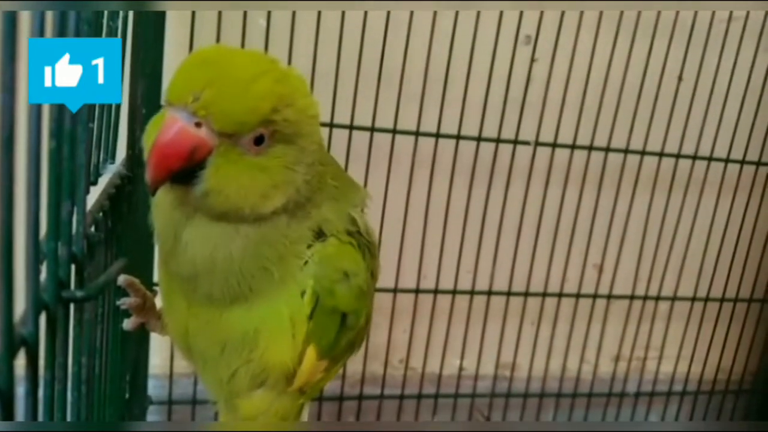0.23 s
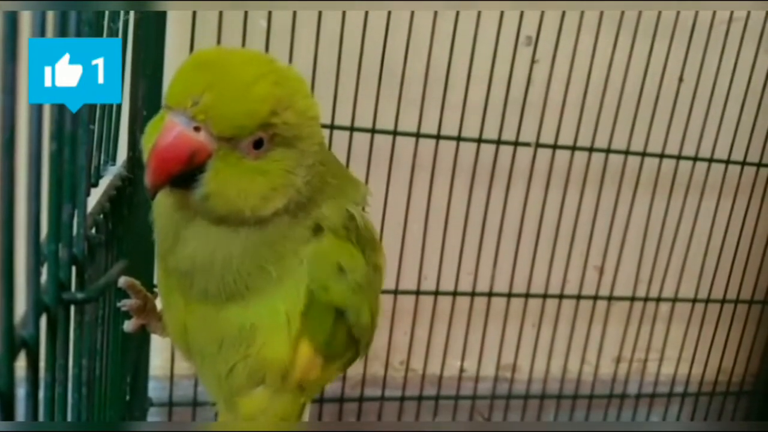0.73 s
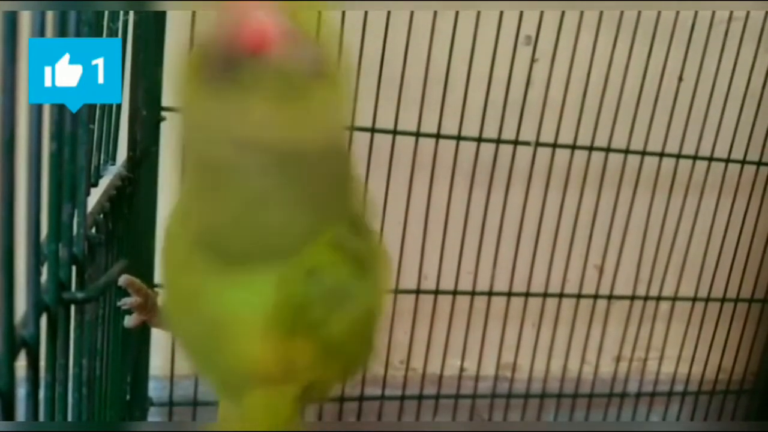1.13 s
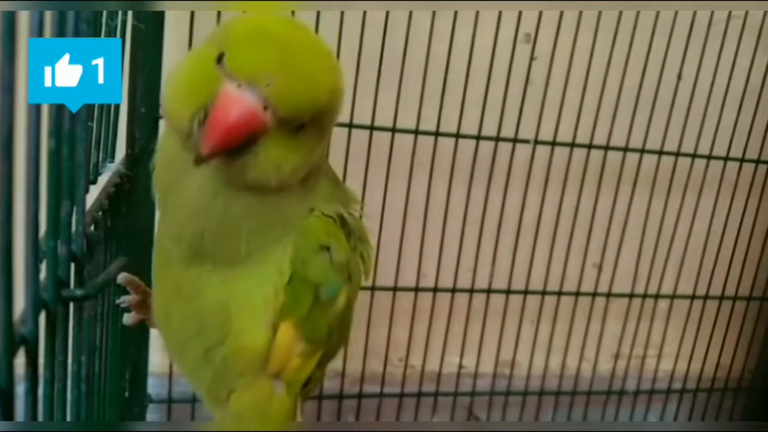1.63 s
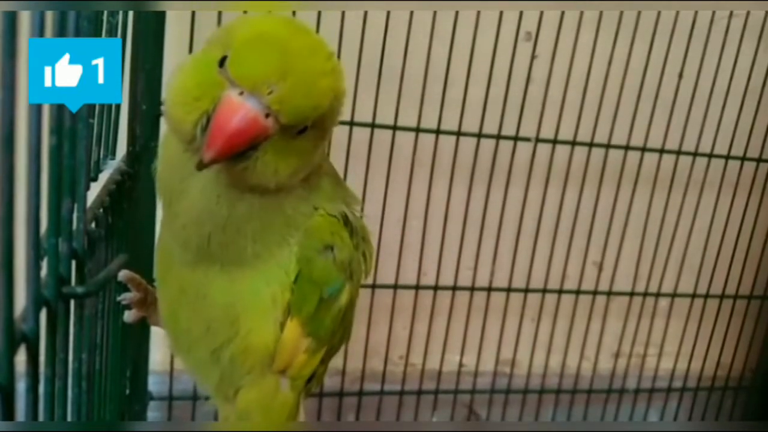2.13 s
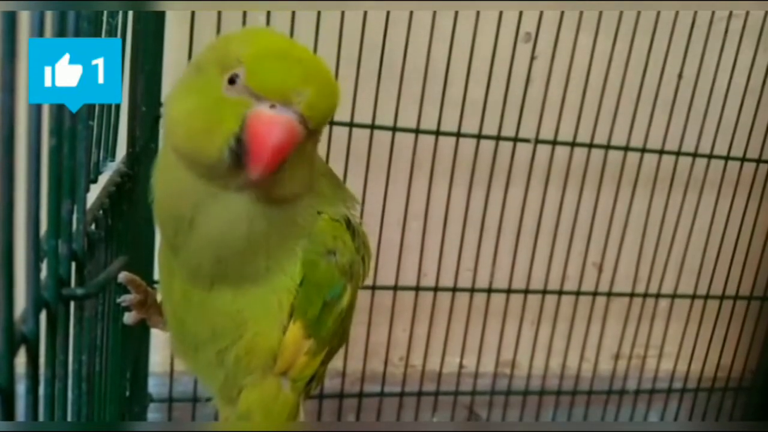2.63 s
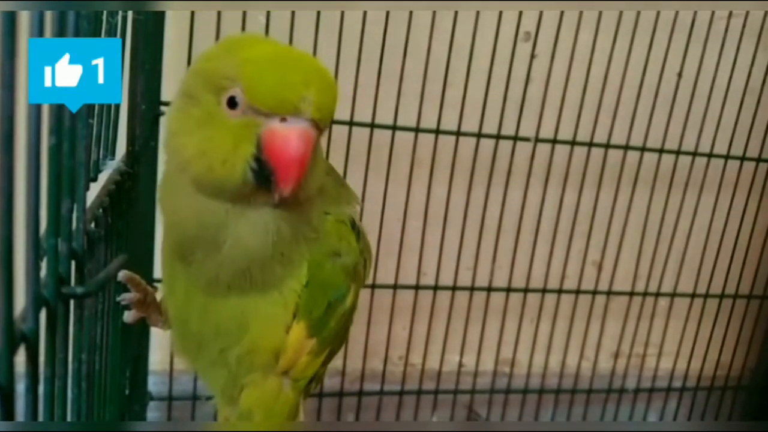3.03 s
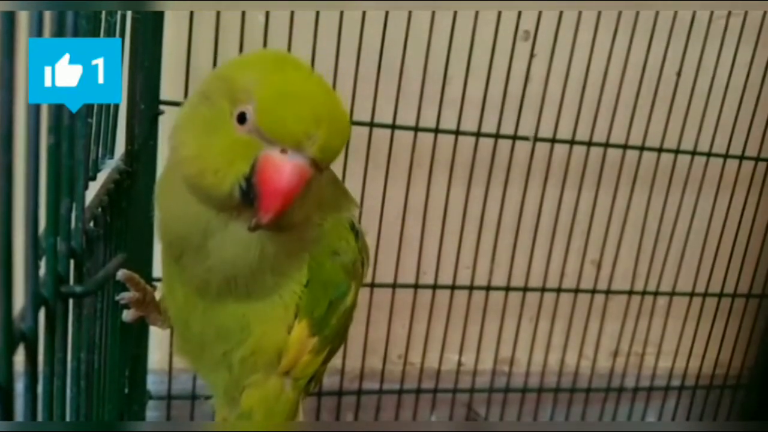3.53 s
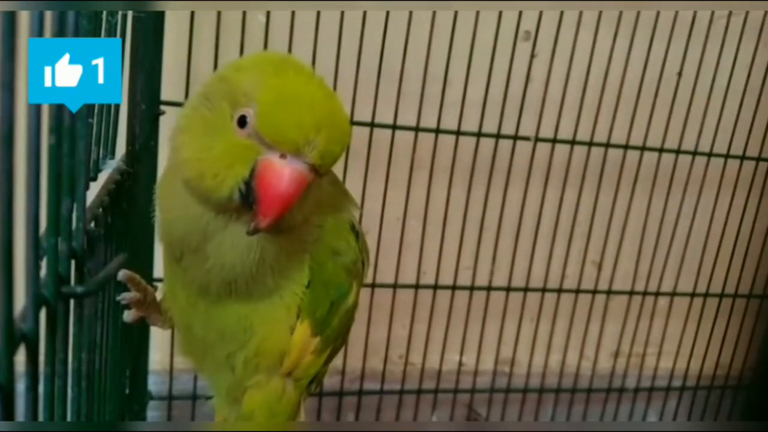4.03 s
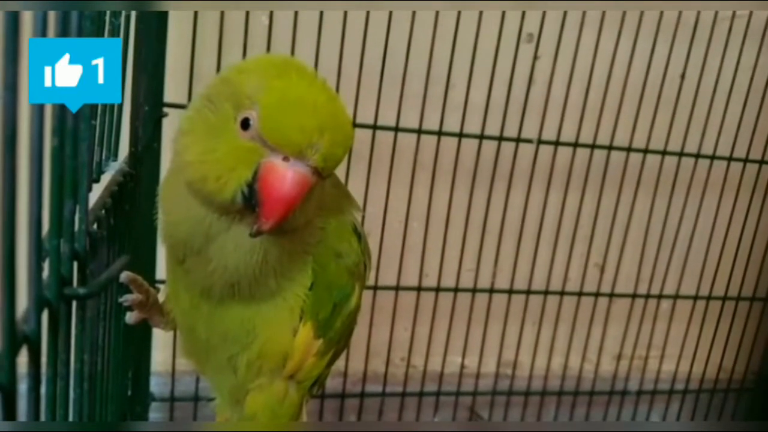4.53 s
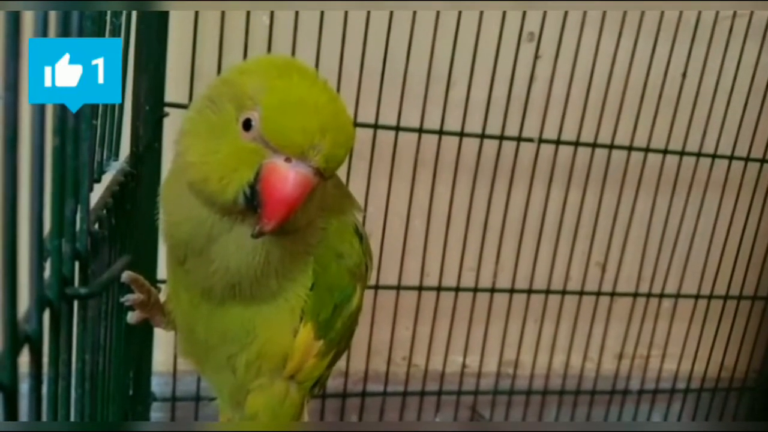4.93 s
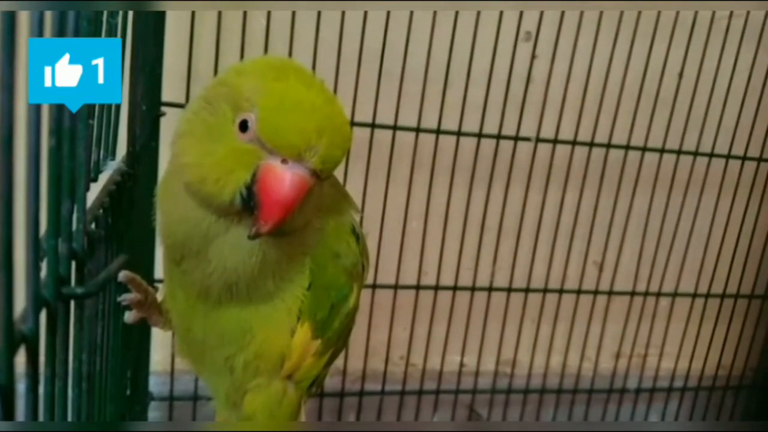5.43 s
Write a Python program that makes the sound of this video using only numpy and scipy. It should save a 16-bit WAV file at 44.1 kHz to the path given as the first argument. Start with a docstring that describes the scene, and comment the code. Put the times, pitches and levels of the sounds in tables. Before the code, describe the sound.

In a hard, reverberant room, a caged parakeet buzzes, squawks and pops with beak clicks, over a more distant bird's gliding whistles.

```python
"""In a hard, echoing room with a low hum, a ring-necked parakeet calls close by in a faintly ringing wire cage.
It gives a long nasal call, four short squawks, a falling cry and five hollow pops, with beak clicks between.
Its calls are a buzz filtered by a throat; pops are short sliding tones, clicks dying tones, rustles hiss.
Further off a small songbird, probably a canary, twitters in gliding whistles. Noise makes the room's echo
and its steady rush; a sine makes the hum."""
import sys
import numpy as np
from scipy import signal
from scipy.fft import rfft, irfft, next_fast_len
from scipy.io import wavfile
from scipy.ndimage import uniform_filter1d, map_coordinates

SR = 44100
rng = np.random.default_rng(int(sys.argv[2]) if len(sys.argv) > 2 else 0)


def int16_out(signal):
    """Quantize to a 16-bit WAV file."""
    q = np.round(np.clip(np.atleast_2d(signal).T, -1, 1) * 32767)
    wavfile.write(sys.argv[1], SR, q.astype(np.int16))


N = 250929
T = np.arange(N) / SR


def undb(db):
    """Turn decibels into a gain."""
    return 10 ** (np.asarray(db) / 20)


def unit(x):
    """Scale to an average (rms) strength of 1."""
    return x / np.sqrt(np.mean(x ** 2))


def add(track, start_s, x):
    """Mix x into the track from the given time."""
    i = int(start_s * SR)
    track[i:i + len(x)] += x[:N - i]


def controls(rows):
    """Join the rows of a curve by straight lines, giving one array a column."""
    time_s, *columns = np.transpose(rows)
    t = np.arange(time_s[0], time_s[-1], 1 / SR)
    return [np.interp(t, time_s, column) for column in columns]


def fade(n, edge_s):
    """A gate that opens and closes softly."""
    return signal.windows.tukey(n, min(1, 2 * edge_s * SR / n))


def wander(n, rate_hz):
    """Smooth chance of spread 1 that changes at the given rate."""
    position = np.arange(n) * rate_hz / SR
    return unit(map_coordinates(rng.standard_normal(8192), [position], order=3, mode="wrap"))


def colour(x, points):
    """Filter to the given (pitch_hz, gain_db) curve; the filter never sounds ahead of its input."""
    n = 2 * next_fast_len(x.shape[-1])
    hz, db = np.transpose(points)
    # the curve is joined evenly by musical interval; +1 avoids the logarithm of zero
    log_hz = np.log(np.fft.rfftfreq(n, 1 / SR) + 1)
    cepstrum = irfft(np.log(undb(np.interp(log_hz, np.log(hz), db))))
    # folding the cepstrum onto its first half gives the shortest delay (minimum phase)
    cepstrum[1:n // 2] *= 2
    cepstrum[n // 2 + 1:] = 0
    return irfft(rfft(x, n) * np.exp(rfft(cepstrum)))[..., :x.shape[-1]]


def ring(modes, t):
    """A struck body sounds several tones at once, each dying away at its own speed."""
    return sum(undb(db - 60 * t / t60_s) * np.sin(2 * np.pi * hz * t) for hz, db, t60_s in modes)


def room_tone(rush_db=-41.5):
    """Filtered noise gives a steady rush, with bass alike left and right; sines give a low hum."""
    # colour of the rush: (pitch_hz, relative_db)
    rush_colour = [(24, -67), (40, -12.5), (85, -11), (124, 1.5), (276, -15), (312, -7), (585, -17),
                   (831, -7.5), (16000, -45.5)]
    # hum tones: (pitch_hz, level_db)
    hum_tones = [(61, -56)]
    mid, side = colour(rng.standard_normal((2, N)), rush_colour)
    side = colour(side, [(60, -24.0), (800, -10), (4000, -4.0)])
    rush = unit(mid + side * np.array([[1], [-1]])) * undb(rush_db)
    hum = sum(undb(db) * np.sqrt(2) * np.sin(2 * np.pi * hz * T) for hz, db in hum_tones)
    return rush + hum


def click(treble_db):
    """The horny beak snaps; a harder contact wakes more of its high modes."""
    # tones of the beak: (pitch_hz, level_db before the treble tilt, t60_s to fall by 60 dB)
    beak_modes = [(800, -4.5, 0.0013), (1860, -10, 0.0017), (2380, 9.5, 0.0068), (3256, -5, 0.021),
                  (5220, 3.5, 0.0028), (7800, 4, 0.0046)]
    tilted = [(hz, db + treble_db * hz / (hz + 5000), t60_s) for hz, db, t60_s in beak_modes]
    snap = ring(tilted, T[:SR // 30])
    return colour(snap, [(80, -20), (400, 7.5)])  # so small a body radiates little bass


def cage_ring(x, cage_db=-60):
    """The wire cage rings in sympathy with every sound the parakeet makes."""
    # tones of the cage: (pitch_hz, level_db, t60_s to fall by 60 dB)
    cage_modes = [(2386, 0, 0.41), (2502, 6, 0.19)]
    return undb(cage_db) * signal.fftconvolve(x, ring(cage_modes, T[:SR // 4]))[:N]


def room(x, wet_db, early_db, t60_s=1.0, early_t60_s=0.12):
    """Hard walls send back sparse first reflections, then a diffuse tail that lacks the top."""
    t = T[:SR]
    noise = rng.standard_normal((2, 2, SR))
    tail = noise[0] * undb(-60 * t / t60_s) * np.clip(t / 0.03, 0, 1)
    tail = colour(tail, [(600, 4.5), (3000, 2.0), (6000, 4.0), (12000, -17)])
    # the fifth power leaves only a few strong peaks standing out
    early = noise[1] ** 5 * undb(-60 * t / early_t60_s) * (t > .002)
    response = sum(undb(db) * part / np.linalg.norm(part, axis=1, keepdims=True)
                   for db, part in ((wet_db, tail), (early_db, early)))
    return signal.fftconvolve(x[None], response, axes=1)[:, :N]


def squawk(hz, db, opening, rough, dull=.7):
    """The syrinx buzzes through the throat; when forced, its cycles go uneven and alternate strong and weak."""
    # throat with the beak nearly shut, and wide open: (pitch_hz, gain_db)
    shut_throat = [(300, -12.5), (650, -10), (1080, -7), (1430, -8), (2150, -0.5), (3100, -11), (4350, -18),
                   (5000, -27), (6700, -24), (7900, -28.5), (9300, -11.5), (10600, -22.5), (13500, -37)]
    open_throat = [(300, -15.5), (850, 0), (1400, -11.5), (1950, 6.5), (2850, 8.5), (3600, -3),
                   (4700, -17.5), (5700, 4.5), (6800, -9.5), (7900, -3.5), (9400, -42), (11200, -23),
                   (13000, -22)]
    # shares of unevenness at roughness 1: in pitch, in level, and on every second cycle
    jitter, shimmer, doubling = .048, .22, .4
    hiss, rasp = .22, .55  # gains of the two noises ahead of roughness
    skew, flicker_db = .45, 4  # pulse spread in radians, and spread of the high overtones' levels
    n = len(hz)
    unevenness = jitter * rough * wander(n, 800) + 0.0037 * wander(n, 220.3)
    hz = uniform_filter1d(hz, SR // 100) * (1 + unevenness)
    phase = 2 * np.pi * np.cumsum(hz) / SR
    soft_db = dull * np.minimum(db + 14.5, 0)  # soft notes lose their overtones
    # the membranes close gradually, which spreads each pulse over its cycle
    pulses = np.zeros(n)
    for k in range(1, 36):
        overtone_db = soft_db * np.maximum(k * hz - 1100, 0) / 1400
        if k > 6:  # the high overtones come and go, each on its own
            overtone_db = overtone_db + flicker_db * wander(n, 18)
        audible = k * hz < SR / 2
        pulses += undb(overtone_db) * np.cos(k * phase + skew * k * k) * audible
    pulses = unit(pulses) * (1 + rough * (shimmer * wander(n, 600) + doubling * np.cos(phase / 2)))
    # turbulence escapes once a cycle, mostly in the treble
    air = rng.standard_normal(N)[:n] * (1 + np.cos(phase))
    air = colour(air, [(1500, -6.0), (4000, 6.0), (9000, 14.0)])
    # at full force the buzz breaks up into a rasp, a burst on every second cycle
    bursts = rng.standard_normal(N)[:n] * (1 + np.cos(phase / 2))
    bursts = colour(bursts, [(700, -10), (2500, 5), (4000, -9)])
    source = pulses + hiss * rough * undb(soft_db) * air + rasp * rough ** 2 * bursts
    opening = np.clip(opening, 0, 1)
    voice = (1 - opening) * colour(source, shut_throat) + opening * colour(source, open_throat)
    # even out the loudness, then give it the wanted level
    steady = voice / np.sqrt(uniform_filter1d(voice ** 2, SR // 160))
    return steady * undb(db) * fade(n, edge_s=0.0062)


def long_call(curve):
    """A drawn-out nasal note buzzes through a nearly shut beak."""
    hz, db = controls(curve)
    return squawk(hz, db, opening=0, rough=.11)


def note(length_s, from_hz, to_hz, bend, flutter_hz, depth_hz):
    """A nearly pure whistle glides between two pitches; its flutter, if any, is a little uneven."""
    waver, slip = 0.018, 0.94  # share of pitch, and radians of flutter timing
    n = int(length_s * SR)
    u = np.linspace(0, 1, n)
    glide = (from_hz + (to_hz - from_hz) * u ** bend) * (1 + waver * wander(n, 299.7))
    flutter = depth_hz * np.sin(2 * np.pi * flutter_hz * T[:n] + slip * wander(n, 69.8))
    # skew under 1 peaks early; a higher taper is more pointed
    skew, taper = 0.41, 0.61
    if depth_hz:  # fluttering notes creep in and peak late
        skew, taper = 1.3, .9
    swell = np.abs(np.sin(np.pi * u ** skew)) ** taper * fade(n, edge_s=0.002)
    return swell * np.sin(2 * np.pi * np.cumsum(glide + flutter) / SR)


def songbird():
    """Trills and single syllables are sung note by note, each note a short whistle."""
    # syllables by name, one to three notes each: (delay_s, length_s, from_hz, to_hz,
    # bend: under 1 glides early and over 1 late, level_db); a pitch factor and a level are applied later
    syllables = { "warble": [(0.00028, 0.098, 4898, 5020, 0.85, 1.5)],
                 "dip": [(0, 0.019, 7200, 6480, 0.63, -5), (.022, 0.0205, 6450, 7200, 0.81, 1.5)],
                 "chip": [(0, .006, 5630, 3740, 0.83, 0.5), (.011, .022, 5360, 3565, 0.452, 0)],
                 "buzz": [(0, .1, 5150, 3937, .35, 1), (.012, .055, 6890, 4330, 1.5, -6.5)],
                 "fall": [(0.0032, .026, 3684, 2550, 0.794, 7.5)],
                 "rise": [(0.0018, 0.019, 3035, 3760, 0.6, 0.5)],
                 "twitter": [(0, 0.02395, 5430, 6140, 0.95, -4), (.021, 0.0178, 4750, 5640, 0.73, 3.5)],
                 "sweep": [(0, .008, 3830, 5000, 0.76, -16), (.006, .039, 5040, 2400, 0.66, -3)],
                 "flourish": [(.006, 0.0212, 2366, 3294, 0.455, -1.5),
                 (.024, 0.0128, 2930, 4680, 0.58, 0.5), (.032, .022, 4550, 4920, 0.59, -0.5)],
                 "flick": [(0, .0125, 5050, 3200, 2.3, -4.5)], "seep": [(0, 0.036, 6610, 4770, 0.59, 0.5),
                 (.04, 0.0374, 5500, 4780, 0.572, 4)], "tsip": [(0, 0.0085, 5640, 4190, 1, -9),
                 (.011, 0.0146, 4865, 3050, 0.783, -2.5), (.041, .009, 4100, 3300, 1, -8.5)],
                 "slur": [(0, .016, 4930, 5700, 0.8, -7), (.016, .024, 4147, 4740, 0.6, 4.5),
                 (.039, .058, 3900, 2500, 1.1, 2.5)], "chirrup": [(0, .016, 4930, 3430, 1.52, 11.5),
                 (.022, .055, 3240, 2160, 1.74, 9)], "whistle": [(0, 0.0319, 5510, 3710, 0.414, -11.5),
                 (.029, .05, 3466, 2500, 3, 0.5)]}
    # syllables whose pitch flutters: (rate_hz, depth_hz)
    flutters = {"warble": (84, 620), "buzz": (170, 460), "twitter": (66, 700)}
    # evenly repeated: (first_s, last_s, period_s roughly, syllable, level_db, pitch_factor)
    trills = [(1.375, 1.726, .07, "chip", -16.5, 0.96), (2.011, 2.259, .24, "buzz", -16, 0.95),
              (2.107, 2.336, .23, "fall", -24, 0.92), (2.478, 3.014, .135, "sweep", -10, 0.92),
              (2.572, 2.968, .133, "twitter", -26.5, 0.92), (3.472, 3.498, .012, "flick", -13, 0.97),
              (3.548, 3.63, .021, "flick", -20.5, 0.51), (3.846, 3.995, .145, "seep", -41.5, 0.91),
              (4.305, 4.359, .054, "tsip", -23, 0.85), (4.424, 4.696, .069, "tsip", -21.5, 0.92),
              (5.137, 5.298, .16, "chirrup", -37, 0.93)]
    # sung once: (start_s, syllable, level_db, pitch_factor)
    singles = [(0.964, "warble", -24.5, 0.99), (1.134, "dip", -24, 0.97), (1.19, "warble", -24.5, 0.98),
               (1.735, "warble", -18.5, 0.89), (2.179, "flick", -18.5, 1.36), (2.431, "rise", -14.5, 1.04),
               (3.096, "slur", -25.5, 0.68), (3.275, "whistle", -14, 1), (3.426, "flourish", -16.5, 1.01),
               (3.517, "fall", -22, 0.97), (4.130, "seep", -35, 0.89), (4.261, "tsip", -30, 0.83),
               (4.795, "slur", -26.5, 0.94), (4.977, "whistle", -22, 0.97)]
    out = np.zeros(N)
    sung = []
    for first_s, last_s, period_s, name, db, factor in trills:
        count = round((last_s - first_s) / period_s) + 1
        for start_s in np.linspace(first_s, last_s, count):
            # no two repeats are quite alike in level and pitch
            level_chance, pitch_chance = rng.standard_normal(2)
            sung.append((start_s, name, db + .8 * level_chance, factor * (1 + .015 * pitch_chance)))
    for start_s, name, db, factor in sung + singles:
        flutter_hz, depth_hz = flutters.get(name, (0, 0))
        for delay_s, length_s, from_hz, to_hz, bend, note_db in syllables[name]:
            whistle = note(length_s, factor * from_hz, factor * to_hz, bend, flutter_hz, depth_hz)
            add(out, start_s + delay_s, undb(db + note_db) * whistle)
    # a thin high whistle of the songbird, and a faint low whine, probably from another bird:
    # (start_s, pitch_hz, level_db)
    for start_s, hz, db in [(4.94, 7130, -50.5), (5.09, 1011, -38.5)]:
        add(out, start_s, undb(db) * note(.13, hz, 0.86 * hz, 1, 0, 0))
    return out


def short_squawk(length_s, top_hz, db, ends_db, opening, rough, slackening, skew, arch):
    """One arch of effort, which may slacken halfway, carries pitch, level and beak together."""
    slack_pitch_share = .3  # at no effort the pitch is lower by this share
    slack_width = 0.13  # as a share of the squawk
    u = np.linspace(0, 1, int(length_s * SR))
    slack = slackening * np.exp(-((u - .56) / slack_width) ** 2)
    effort = (1 - np.abs(2 * u ** skew - 1) ** arch) * (1 - slack)
    hz = top_hz * (1 - slack_pitch_share * (1 - effort))
    hz = hz * (1 - 0.37 * rough * np.clip(2 * u - 1, 0, 1))  # a forced squawk droops at the end
    return squawk(hz, db + ends_db * (1 - effort), opening * effort, rough, dull=1.2)


def falling_cry():
    """The pitch drops and levels off; an accent makes the cry louder, brighter and rougher for a moment."""
    length_s, attack_s, release_s = 0.27, 0.051, 0.048
    base_db, onset_db, end_db = -16.5, -10, -22  # the last two are relative to the first
    from_hz, to_hz, settle_s, bend = 1254, 678, .069, 1.52
    accent_after_s, accent_width_s, accent_db = 0.071, 0.05, 7.5
    gape, rough, accent_rough = 1.0, 0.15, 0.084  # the accent throws the beak open
    t = T[:int(length_s * SR)]
    hz = to_hz + (from_hz - to_hz) * np.exp(-(t / settle_s) ** bend)
    accent = np.exp(-((t - accent_after_s) / accent_width_s) ** 2)
    edges_db = np.interp(t, [0, attack_s, length_s - release_s, length_s], [onset_db, 0, 0, end_db])
    db = base_db + edges_db + accent_db * accent
    cry = squawk(hz, db, gape * accent, rough + accent_rough * accent, dull=1.0)
    return colour(cry, [(2100, 0), (2600, -5), (7000, 1)])


def pop(hz, length_s=0.0085, glide=0.025):
    """A hollow blip of about ten cycles swells fast and slides up like a drip."""
    u = np.linspace(0, 1, int(length_s * SR))
    phase = 2 * np.pi * np.cumsum(hz * (1 + glide * (u - .3))) / SR
    spit = colour(rng.standard_normal(N)[:len(u)], [(8000, -25.0), (11300, -17.5), (14000, -35)])
    return np.sin(np.pi * u ** 0.7) ** 2 * (np.sin(phase) + spit)


def rustle(length_s):
    """Feathers sliding over each other give a brief high hiss."""
    n = int(length_s * SR)
    hiss = colour(rng.standard_normal(N)[:n], [(3000, -7), (6500, 8.0), (8500, 5), (12000, -44)])
    return unit(hiss) * np.hanning(n)


def parakeet():
    """The bird's clicks, calls, pops and rustles, with the cage ringing along."""
    # beak clicks and ticks: (start_s, level_db, treble_db)
    clicks = [(.177, -10.5, -80), (2.702, -5, -77), (4.16, -23.5, -48), (5.064, -36, 26),
              (5.0655, -32, 18.5), (5.067, -13.5, -24), (5.4632, -28, -4), (5.4647, -16, -10.5)]
    # the long nasal call as a curve: (time_s, pitch_hz, level_db)
    call_curve = [(0.425, 532, -53), (0.447, 535.4, -35.5), (0.51, 685.5, -17), (0.561, 739.4, -16),
                  (0.672, 711.4, -13), (0.78, 701.1, -12.5), (0.915, 652.6, -14), (0.937, 628, -14),
                  (0.947, 569, -21.5)]
    # short squawks: (start_s, length_s, top_pitch_hz, level_db, ends_db relative to level,
    # beak opening 0-1, roughness, slackening halfway 0-1, skew: over 1 peaks late, arch: higher is flatter on top)
    squawks = [(1.099, 0.078, 541, -29.5, -2.5, 0, 0.14, 0.15, 0.656, 3.08),
               (1.229, 0.1, 607.2, -14, -3.5, 0.03, 0.27, 0.2, 1.15, 3.3),
               (1.407, .051, 578.2, -12, -9, 0.35, 0.49, 0, .95, 2),
               (1.561, 0.089, 775.3, -10.5, -19.5, 0.51, 1.1, 0, 1.35, 1.94)]
    # hollow pops: (start_s, peak_db of the tone, pitch_hz)
    pops = [(2.657, -13.5, 1076), (2.886, -10, 1091), (3.106, -9.5, 1160), (3.335, -7.5, 1296),
            (3.552, -9, 1173)]
    # feather rustles: (start_s, length_s, level_db)
    rustles = [(3.922, 0.071, -37.5), (5.317, 0.05, -42)]
    out = np.zeros(N)
    for start_s, db, treble_db in clicks:
        add(out, start_s, undb(db) * click(treble_db))
    add(out, call_curve[0][0], long_call(call_curve))
    for start_s, *shape in squawks:
        add(out, start_s, short_squawk(*shape))
    add(out, 1.787, falling_cry())
    for start_s, db, hz in pops:
        add(out, start_s, undb(db) * pop(hz))
    for start_s, length_s, db in rustles:
        add(out, start_s, undb(db) * rustle(length_s))
    return out + cage_ring(out)


def place(x, pan_db, lag_ms):
    """Two microphones: the left is louder by pan_db, the right later by lag_ms."""
    khz = np.fft.rfftfreq(2 * N, 1000 / SR)
    late = irfft(rfft(x, 2 * N) * np.exp(-2j * np.pi * khz * lag_ms))[:N]
    return np.array([x * undb(pan_db / 2), late * undb(-pan_db / 2)])


def scene():
    """The parakeet is near and a little to the left; the songbird is mostly heard through the room."""
    # the songbird turns its head: (time_s, left_minus_right_db, direct_sound_db)
    facing = [(1.951, 35, -16.5), (2.45, -5, 1), (3.55, -4, 0.5), (4.65, -17.5, -4.5), (5.25, -25.5, -12.5)]
    near, far = parakeet(), songbird()
    left, right = place(near, pan_db=4.0, lag_ms=0.026)
    right = colour(right, [(5500, 0), (9000, -10.0)])  # the far microphone is shaded in the treble
    time_s, *columns = np.transpose(facing)
    pan_db, direct_db = (np.interp(T, time_s, column) for column in columns)
    song = place(far * undb(direct_db), pan_db=pan_db, lag_ms=-0.0044)
    near_echo = room(near, wet_db=-26.5, early_db=-8)
    far_echo = room(far, wet_db=-5.5, early_db=-4.0)
    return np.array([left, right]) + near_echo + song + far_echo + room_tone()


def record(dry, top_hz=15900):
    """The recorder clips at full scale and cuts the top."""
    low_pass = signal.ellip(10, .2, 80, top_hz, fs=SR, output="sos")
    return signal.sosfilt(low_pass, np.clip(dry, -1, 1))


dry = scene()
out = record(dry)
int16_out(out)
```